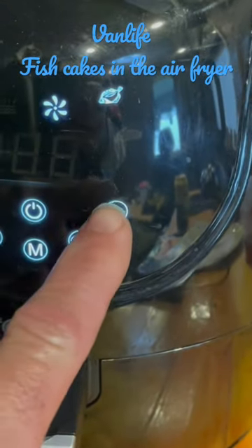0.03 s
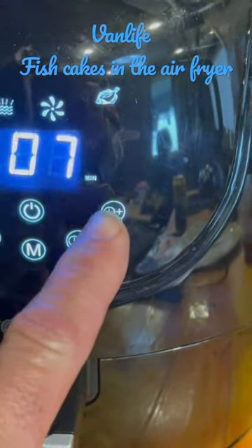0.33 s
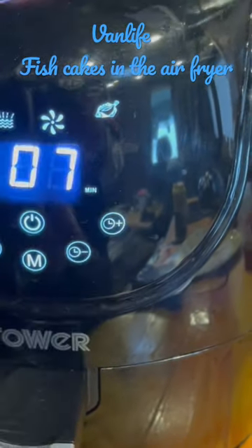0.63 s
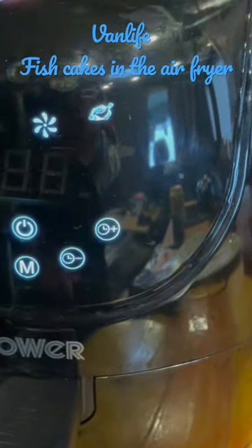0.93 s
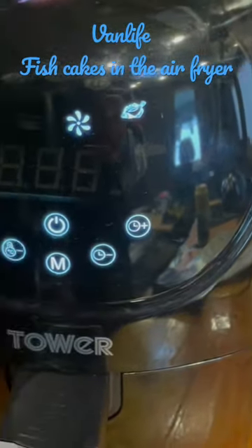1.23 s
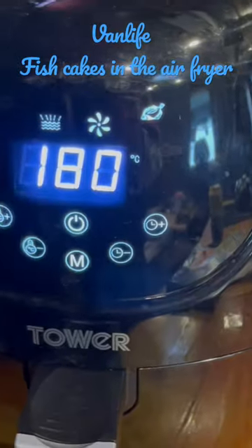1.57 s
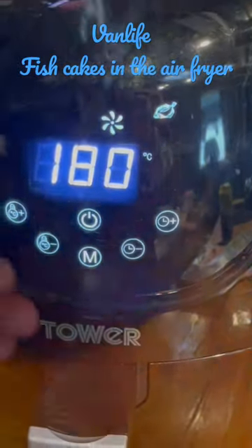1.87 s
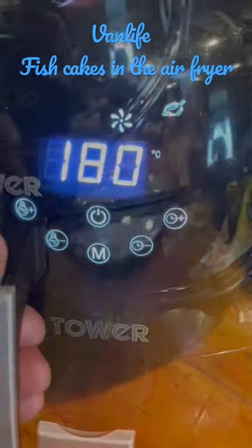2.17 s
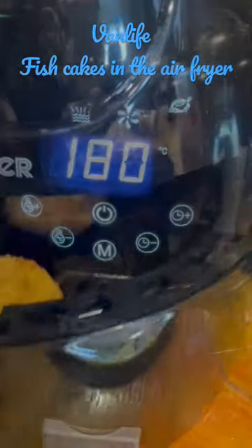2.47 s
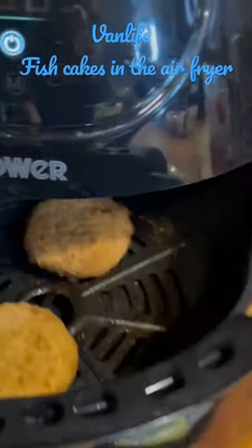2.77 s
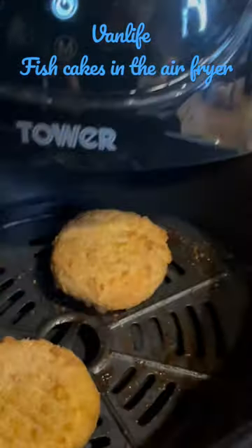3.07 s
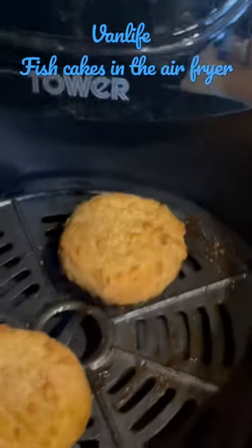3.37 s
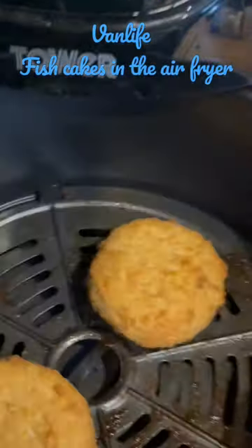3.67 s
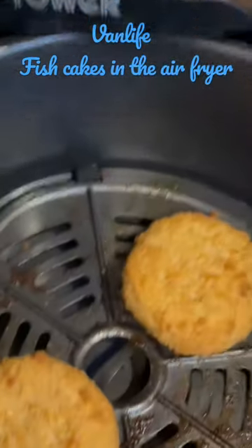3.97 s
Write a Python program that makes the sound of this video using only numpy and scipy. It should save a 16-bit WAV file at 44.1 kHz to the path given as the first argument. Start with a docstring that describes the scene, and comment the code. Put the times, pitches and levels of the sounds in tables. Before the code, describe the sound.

Air fryer whirring, cut off by a click as the drawer slides out and clunks.

```python
"""A small room, close to an air fryer: its fan whirs with rushing air and motor tones over a low hum.
The drawer's catch snaps open and cuts the fan. The housing thuds, and the drawer knocks over its
runners and slides out with a sizzling scrape, its pan ringing, groaning and squealing from friction.
It rests briefly, slides on and clunks against its end stop."""
import sys
import numpy as np
from scipy import signal
from scipy.fft import rfft, irfft
from scipy.io import wavfile
from scipy.ndimage import map_coordinates

SR = 44100
rng = np.random.default_rng(int(sys.argv[2]) if len(sys.argv) > 2 else 0)


def file_out(sig):
    """Save sig as 16-bit WAV at sys.argv[1]."""
    # one column per channel
    cols = np.atleast_2d(sig).T
    # limit, then scale
    lim = np.clip(cols, -1, 1)
    pcm = np.round(lim * 32767).astype(np.int16)
    wavfile.write(sys.argv[1], SR, pcm)


N = 176400


def amp(db):
    """Decibels to gain."""
    return 10 ** (np.asarray(db) / 20)


def unit(x):
    """Scale to rms 1."""
    return x / np.sqrt(np.mean(x ** 2) + 1e-20)


def curve(rows):
    """A (t/s, value) table as an envelope over the whole scene."""
    return np.interp(np.arange(N) / SR, *np.array(rows).T)


def per_bin(rows, size):
    """A (f/Hz, value) table at every frequency of a spectrum."""
    hz, value = np.array(rows, float).T
    return np.interp(np.log(np.fft.rfftfreq(size, 1 / SR) + 1), np.log(hz), value)


def colour(x, rows):
    """EQ x by a (f/Hz, level/dB) table, with a steep low cut below its first point; rms 1."""
    low_cut = np.minimum(np.fft.rfftfreq(len(x), 1 / SR) / rows[0][0], 1) ** 3
    return unit(irfft(rfft(x) * amp(per_bin(rows, len(x))) * low_cut, len(x)))


def noise(size=N):
    """White noise."""
    return rng.standard_normal(size)


def wander(rate_hz):
    """Smooth random modulation up to about rate_hz; rms 1."""
    f = np.fft.rfftfreq(N, 1 / SR)
    return unit(irfft(rfft(noise()) / (1 + (f / rate_hz) ** 4), N))


def tone(hz):
    """A sine of rms 1 that follows a pitch curve."""
    return np.sqrt(2) * np.sin(2 * np.pi * (np.cumsum(hz) / SR + rng.random()))


def resonate(x, hz, width_hz, skirt=1):
    """A narrow resonance, its flanks steepened by a second one skirt times as wide; rms 1."""
    for width in (width_hz, skirt * width_hz):
        x = unit(signal.lfilter(*signal.iirpeak(hz, hz / width, SR), x))
    return x


def blows(hits, spectrum, modes, t60_s, ring_db, rise_s=0.0006):
    """Each hit rings the modes over a plastic clatter whose treble dies first; each has its own tilt."""
    out, size = np.zeros(N), 16384
    t, f = np.arange(size) / SR, np.fft.rfftfreq(size, 1 / SR) + 1
    octaves_hz = 125 * 2. ** np.arange(8)
    mode_hz, mode_db, mode_t60 = np.array(modes).T[:, :, None]
    for start, db, tilt, pitch, length in hits:
        burst = rfft(colour(noise(size), [(hz, level + tilt * np.log2(hz)) for hz, level in spectrum]))
        clatter = 0
        for hz in octaves_hz:
            band = irfft(burst * np.interp(np.log(f), np.log(octaves_hz), octaves_hz == hz))
            band_t60 = length * t60_s * (1000 / hz) ** 0.089
            clatter = clatter + band * amp(-60 * t / band_t60)
        gain = amp(mode_db + tilt * np.log2(mode_hz) + 0.79 * noise(mode_hz.shape))
        tuned_hz = pitch * mode_hz * (1 + 0.011 * noise(mode_hz.shape))
        partials = gain * np.sin(2 * np.pi * tuned_hz * t) * amp(-60 * t / (length * mode_t60))
        ring = partials.sum(0) / np.sqrt(np.sum(gain ** 2) / 2)
        body = (clatter + amp(ring_db) * ring) / np.hypot(1, amp(ring_db))
        attack = 1 - np.exp(-t / rise_s)
        i = int(start * SR)
        out[i:i + size] += (amp(db) * body * attack)[:N - i]
    return out


def fan():
    """Turbulent air, a ringing duct, blade and motor tones; all run down once the power is cut."""
    # air rushing through the housing: f/Hz, level/dB
    air_spectrum = [(30, -37), (60, -15), (120, -2), (165, 1), (235, 2.5), (270, -2.5), (380, -3.5),
                    (480, -13.5), (700, -22.5), (1000, -24.5), (1220, -24), (1450, -29.5), (1620, -29.5),
                    (1900, -39.5), (2250, -30.5), (2550, -34.5), (3400, -36), (4200, -35.5), (6000, -42),
                    (8000, -45), (10500, -48.5), (12500, -119)]
    # swells of the air's low rumble: t/s, level/dB
    rumble_swell = [(0, 0), (.7, 0.5), (.85, 0.5), (1, -1), (1.21, -0.5), (1.3, -5.5), (1.39, 5),
                    (1.47, -5), (1.58, 0), (1.65, -1), (1.71, 0), (1.88, -0.5), (2.3, -1)]
    # air duct resonances: f/Hz, width/Hz, level/dB
    duct_modes = [(1208, 77, -54.5), (1583, 120, -59), (2150, 47, -65), (2262, 45, -62), (2400, 41, -69.5),
                  (2860, 80, -64.5), (3184, 100, -65), (3348, 58, -62.5)]
    # motor tones: multiple of the shaft rate, level/dB
    motor_tones = [(2.355, -42.5), (4.05, -41.5), (9.82, -47), (18.4, -62.5)]
    # the blade tone swells and fades: t/s, level/dB
    blade_level = [(0, -35.5), (.55, -39), (.62, -37), (.7, -37), (.93, -29.5), (.99, -46), (1.06, -33),
                   (1.2, -29), (1.26, -46.5), (1.41, -28), (1.54, -42), (1.6, -32), (1.8, -37),
                   (2.27, -38.5)]
    # nearness of the fan: t/s, level/dB
    nearness = [(0, -1.5), (.7, -0.5), (1.7, -0.5), (2.1, -3.5), (2.3, -6.5)]
    running_hz, blades, power_cut_s = 42.9, 8, 2.338
    coast_s = np.maximum(np.arange(N) / SR - power_cut_s, 0)
    shaft_hz = running_hz * np.exp(-0.1 * coast_s ** 2) * (1 + 0.0018 * wander(3.3))
    swirl = 1 + 0.03 * tone(shaft_hz)  # one pulse a turn
    air = colour(noise(), air_spectrum) * amp(-28 + 0.67 * wander(53)) * swirl
    rumble = signal.sosfiltfilt(signal.butter(4, 425, fs=SR, output="sos"), air)
    air = air - rumble + rumble * amp(curve(rumble_swell))
    duct = sum(amp(db) * resonate(noise(), hz, width) for hz, width, db in duct_modes)
    motor = sum(amp(db + 3.1 * wander(2.4)) * tone(k * shaft_hz) for k, db in motor_tones)
    blade = amp(curve(blade_level)) * tone(blades * shaft_hz)
    whine = (motor + blade) * amp(-40 * coast_s)  # the tones die faster than the air
    return (air + duct + whine) * amp(curve(nearness) - 45 * coast_s)


def hum():
    """A compressor and the mains drone over quiet room tone."""
    # hum partials: f/Hz, level/dB
    partials = [(49.8, -54.5), (74.7, -35.5), (100.2, -56.5), (149.4, -44.5)]
    # gentle rise and fall of the hum: t/s, level/dB
    hum_level = [(0, 1.5), (1.9, -0.5), (2.2, -2), (2.42, -5), (2.55, -2.5), (2.75, 1), (3.3, 0.5), (4, 1)]
    # room tone: f/Hz, level/dB
    room_spectrum = [(25, -32), (52, 5.5), (85, -2), (125, -8), (190, -13), (250, -15), (330, -23),
                     (700, -35), (1800, -32), (4000, -60.5), (12000, -75)]
    drone = sum(amp(db) * tone(hz * (1 + 0.00027 * wander(2.0))) for hz, db in partials)
    return drone * amp(curve(hum_level)) + amp(-46) * colour(noise(), room_spectrum)


def latch_snap():
    """The catch lets go in a tight cluster of sharp clicks."""
    # clicks: t/s, level/dB, tilt/dB per octave, pitch ratio, ring time ratio
    hits = [(2.1255, -30.5, 3.5, 0.86, 1), (2.1635, -20, -5.5, 1, 0.34), (2.1678, -14.5, 0, 1, 0.92),
            (2.1735, -35, -2.5, 0.79, 1)]
    # noise of a click: f/Hz, level/dB
    spectrum = [(300, -29), (500, -4.5), (1000, -9), (1500, 3), (2500, -14), (4000, -8), (6000, -12),
                (9000, -16), (12000, -19), (15000, -68)]
    # modes of the catch: f/Hz, level/dB, t60/s
    modes = [(546, 9, 0.034), (830, 5, 0.038), (1255, -7, 0.064), (1500, -6, 0.056), (2060, -2, 0.04),
             (2540, 5, 0.037), (3570, -15, 0.022), (5700, -21, .03)]
    return blows(hits, spectrum, modes, t60_s=0.042, ring_db=-3.5, rise_s=0.0002)


def friction():
    """Tiny slips of uneven size over a smooth hiss."""
    slips_per_s, spread_db, slip_share = 1800, 2, 0.43
    slips = (rng.random(N) < slips_per_s / SR) * np.sign(noise())
    sizes = amp(spread_db * np.minimum(rng.exponential(size=N), 5))
    return np.sqrt(slip_share) * unit(slips * sizes) + np.sqrt(1 - slip_share) * noise()


def slide_hiss():
    """The sliding drawer sizzles, louder the faster it is pulled."""
    # hiss of the slide: f/Hz, level/dB
    spectrum = [(350, -2), (520, -3.5), (800, -5.5), (1000, -10.5), (1250, -12), (1700, 0), (2300, -11),
                (2650, -2.5), (3000, -2), (3600, -5.5), (4600, 0), (6000, 1), (8000, -0.5), (10500, 2),
                (12000, -18), (13200, -29)]
    # speed of the pull, as loudness: t/s, level/dB
    pull = [(2.17, -32), (2.22, -8.5), (2.42, -4.5), (2.5, -12), (2.6, 0.5), (2.76, -4.5), (2.88, 5),
            (3.04, 2.5), (3.12, -4), (3.19, -13), (3.24, -24), (3.28, -29), (3.31, -7), (3.38, 2),
            (3.49, -3), (3.56, 1.5), (3.72, -3.5), (3.89, -4.5), (4, -9)]
    return colour(friction(), spectrum) * amp(-51 + curve(pull) + wander(25))


def housing_thuds():
    """The housing takes the load with low, soft-edged thuds."""
    # thuds: t/s, level/dB, tilt/dB per octave, pitch ratio, ring time ratio
    hits = [(2.194, -19, -2, 0.94, 1), (3.912, -20.5, 1, 0.98, 0.88), (3.962, -21, -1, 1, 0.84)]
    # noise of a thud: f/Hz, level/dB
    spectrum = [(110, 1), (180, -2), (260, -2), (350, 0), (480, -21), (1200, -60)]
    # low modes of the housing: f/Hz, level/dB, t60/s
    modes = [(180, -4.5, 0.12), (226.3, 3.5, .16), (327, -5, 0.13)]
    return blows(hits, spectrum, modes, t60_s=0.15, ring_db=3, rise_s=0.012)


def runner_knocks():
    """The drawer knocks on its runners and rings hollow."""
    # knocks: t/s, level/dB, tilt/dB per octave, pitch ratio, ring time ratio
    hits = [(2.539, -24, -0.5, 0.99, 0.68), (2.543, -29, 3, 1.01, 0.74), (2.566, -31.5, 0.5, 0.96, 0.64),
            (2.6235, -30, 3, 0.95, 1.1), (2.6275, -22, 1.07, 1, 1.06), (2.6455, -28, -5.5, 1.07, 1.3),
            (2.671, -27.5, 0, 1, 0.94), (2.683, -38, 0, 1.1, 0.74), (2.7145, -30, -1, 1, 0.72),
            (2.7515, -32.5, 0, 0.98, 0.77)]
    # noise of a knock: f/Hz, level/dB
    spectrum = [(200, 4), (320, 7), (420, 4.5), (510, 4.5), (780, -13), (1050, 2), (1290, -37), (1650, 3.5),
                (2080, -23), (2300, -13), (2600, -22), (3100, -15.5), (4300, -13.5), (6000, -18.5),
                (9000, -22), (13000, -47)]
    # modes of the drawer on its runners: f/Hz, level/dB, t60/s
    modes = [(228, -10, 0.15), (306, 4, 0.064), (496.2, 5.5, 0.26), (686, -0.5, 0.13), (870, -1.5, 0.12),
             (976, 6.5, 0.051), (1090, 3, 0.029), (1475, 0.5, 0.064), (1582, 1.5, 0.07), (1684, 2, 0.044),
             (1847, -2.5, 0.15), (1936, -19, 0.087), (2284, 1.5, 0.042), (2810, -10.5, 0.16),
             (3178, -9, 0.19), (3620, -22, .06)]
    return blows(hits, spectrum, modes, t60_s=0.1, ring_db=1.5)


def pan_rub():
    """Uneven friction at the rim rings the pan, with new resonances once it hangs far out."""
    # resonances of the hollow pan, its thin rim and the overhanging pan: f/Hz, width/Hz, level/dB
    hollow = [(499, 25, -1), (547, 33, 3), (1004, 66, -6)]
    rim = [(1385, 31, -5.5), (1653, 59, -6), (1894, 66, -2), (2207, 36, -4), (2884, 210, -5),
           (3610, 150, -6.5), (4170, 140, -9.5), (5430, 100, -7), (5900, 120, -8), (6450, 110, -10)]
    overhang = [(640, 55, -12.5), (910, 96, -11), (1470, 89, 2.5), (1750, 120, 1), (2040, 60, -0.5),
                (2330, 70, 3), (2880, 130, -1.5), (5300, 60, -11)]
    # envelope of each set: t/s, level/dB
    hollow_level = [(2.65, -67), (2.76, -53), (2.83, -65), (2.89, -50), (2.96, -54), (3.04, -48.5),
                    (3.09, -61), (3.25, -74), (3.42, -54), (3.55, -60), (3.7, -77), (4, -62)]
    rim_level = [(2.55, -62), (2.68, -50), (2.77, -57), (2.82, -56), (2.88, -57), (3.0, -53.5),
                 (3.045, -45.5), (3.09, -57), (3.18, -55), (3.25, -72.5), (3.4, -65), (4, -58)]
    overhang_level = [(3.26, -74), (3.34, -57.5), (3.43, -55.5), (3.5, -59.5), (3.56, -53), (3.68, -56.5),
                      (3.78, -63), (3.87, -61), (4, -56)]
    out = 0
    for modes, level in [(hollow, hollow_level), (rim, rim_level), (overhang, overhang_level)]:
        ring = 0
        for hz, width, db in modes:
            scrape = friction() * amp(3.1 * wander(16))
            ring = ring + amp(db) * resonate(scrape, hz, width, skirt=4)
        out = out + unit(ring) * amp(curve(level))
    return out


def runner_groan():
    """Friction on the runner rings one hollow resonance, higher while the pull is firm."""
    # glide of the groan: t/s, f/Hz, level/dB
    glide = [(2.82, 507, -72), (2.89, 543, -47), (2.94, 614, -55), (3.0, 670, -49.5), (3.045, 600, -58),
             (3.09, 555, -77), (3.2, 550, -95)]
    times, hz, db = np.array(glide).T
    ring = resonate(friction(), hz[0], width_hz=45, skirt=2)
    playhead = np.cumsum(curve(np.c_[times, hz]) / hz[0])  # varispeed bends the pitch
    return map_coordinates(ring, [playhead], order=1, mode="mirror") * amp(curve(np.c_[times, db]))


def rim_squeals():
    """The rim sticks and slips in short, rough, nearly pure tones."""
    # squeals: t/s, hold/s, f/Hz, level/dB
    squeals = [(2.852, 0.018, 3790, -50), (2.89, 0.035, 3760, -56), (2.866, 0.039, 2940, -57),
               (2.924, 0.025, 2900, -52.5), (2.98, .035, 2940, -53), (3.028, 0.03, 2880, -48.5),
               (3.062, 0.027, 2890, -56), (3.945, 0.011, 1748, -35)]
    attack_s, release_s = 0.0045, 0.008
    t, out = np.arange(N) / SR, 0
    waver, rough_db = 1 + 0.01 * wander(200), 2 * wander(220)
    for start, hold, hz, db in squeals:
        attack = np.clip((t - start) / attack_s, 0, 1)
        release = np.exp(-np.maximum(t - start - hold, 0) / release_s)
        out = out + amp(db + rough_db) * attack * release * tone(hz * waver)
    return out


def pan_bumps():
    """The pan bumps softly as it slides."""
    # bumps: t/s, level/dB, tilt/dB per octave, pitch ratio, ring time ratio
    hits = [(3.116, -44, 0.5, 0.91, 2.1), (3.3135, -43, -5, 1.16, 0.49), (3.521, -42.5, 5, .95, 0.84)]
    # noise of a bump: f/Hz, level/dB
    spectrum = [(400, -10), (600, 3), (900, -10), (1300, -17), (3000, -21), (9000, -42)]
    # modes of the bumped pan: f/Hz, level/dB, t60/s
    modes = [(600, -0.5, 0.047), (678, -3, .05), (919, -7.5, 0.07)]
    return blows(hits, spectrum, modes, t60_s=0.073, ring_db=1.5)


def end_stop_clunks():
    """The drawer chatters against its end stop."""
    # clunks: t/s, level/dB, tilt/dB per octave, pitch ratio, ring time ratio
    hits = [(3.9025, -23, 3.5, 1.05, 0.5), (3.908, -23, -1, 1.04, 0.73), (3.919, -23.5, -5.5, 1.02, 1),
            (3.931, -25, -1, 1.04, 0.76), (3.9475, -28.5, 0, 1.26, 0.58), (3.959, -29, -0.5, 1.1, 0.62),
            (3.976, -27, -6.5, 0.93, 0.9)]
    # noise of a clunk: f/Hz, level/dB
    spectrum = [(200, 4.5), (350, -1.5), (430, 0), (560, 2), (800, -11.5), (1250, -2.5), (1500, -20),
                (1750, -3), (2000, -19), (2400, -11), (3100, -24), (4100, -19), (5500, -32), (8000, -25),
                (13000, -46)]
    # modes of the drawer when fully out: f/Hz, level/dB, t60/s
    modes = [(323, -4, .2), (502.5, 1.5, 0.25), (580, -5, 0.048), (692, 0, 0.046), (947, -13, 0.11),
             (1190, 1.5, 0.036), (1280, -3, 0.086), (1698, -2, .07), (1795, 3, 0.06), (2162, -3, 0.18),
             (2322, -6.5, 0.13), (3920, -14, 0.065)]
    return blows(hits, spectrum, modes, t60_s=0.087, ring_db=-1.5)


def reflections(x, t60_s):
    """Dense reflections of a small room, as strong as their source."""
    t = np.arange(SR // 2) / SR
    tail = noise(len(t)) * amp(-60 * t / t60_s) * (t > 0.003)
    return signal.fftconvolve(x, tail / np.linalg.norm(tail))[:N]


def microphone_pair(sound):
    """Two microphone ports hear the sound apart in phase and level; diffuse reflections widen it."""
    # lead of the left port: f/Hz, phase/rad
    lead = [(20, 0), (1640, 0), (2240, .4), (2580, 1.1), (3270, .4), (3960, .8), (4600, 1.8), (5300, 5.2),
            (5770, 6.2), (6200, 6.5), (8500, 9.0), (10200, 10.0), (11500, 12.3), (13000, 12.7)]
    # left over right: f/Hz, level/dB
    balance = [(110, 0), (360, -.6), (650, .6), (1180, 2.3), (2150, .3), (3900, -1.2), (7000, 0)]
    # diffuse share of the sound: f/Hz, level/dB
    diffuse_share = [(70, -42), (250, -26), (600, -13), (2000, -9), (5000, -11), (10000, -16)]
    size, sides = N + SR, np.array([[1], [-1]])
    diffuse = rfft(reflections(sound, t60_s=0.026), size) * amp(per_bin(diffuse_share, size))
    gain = amp(sides * per_bin(balance, size) / 2)
    phase = np.exp(1j * sides * per_bin(lead, size) / 2)
    return irfft((rfft(sound, size) + sides * diffuse) * gain * phase, size)[:, :N]


def scene():
    """Fan and hum as the bed, the drawer's scrape and hits on top, a short room tail on the hits."""
    bed = fan() + hum()
    scrape = slide_hiss() + pan_rub() + runner_groan() + rim_squeals()
    hits = latch_snap() + housing_thuds() + runner_knocks() + pan_bumps() + end_stop_clunks()
    return microphone_pair(bed + scrape + hits + amp(-9) * reflections(hits, t60_s=0.12))


def record(dry):
    """A phone's steep low-pass cuts the top."""
    return signal.sosfilt(signal.ellip(8, 0.2, 70, 13400, fs=SR, output="sos"), dry)


dry = scene()
out = record(dry)
file_out(out)
```